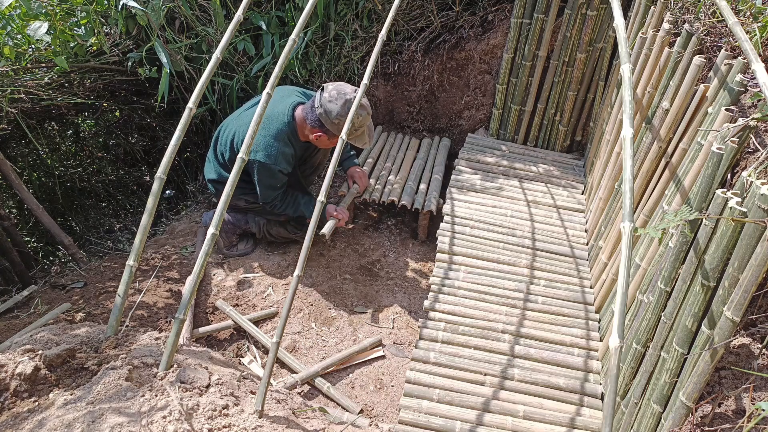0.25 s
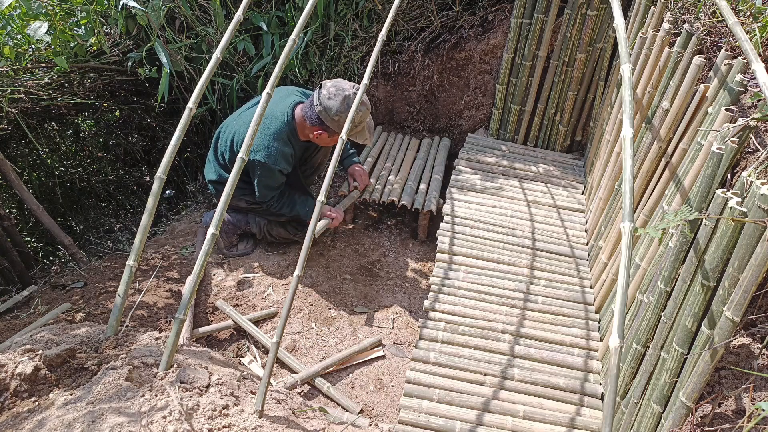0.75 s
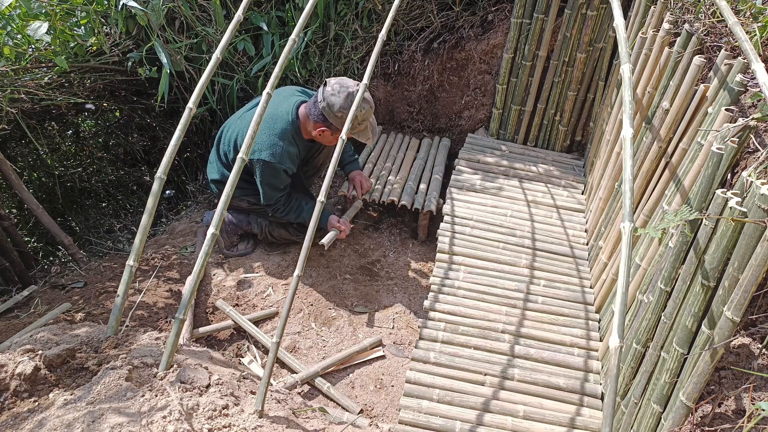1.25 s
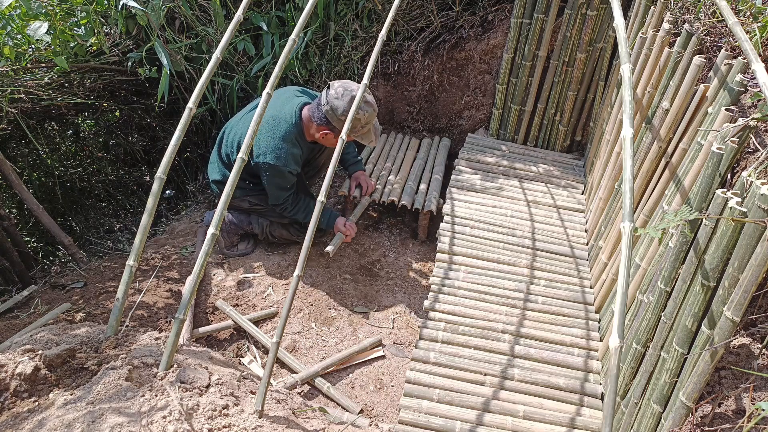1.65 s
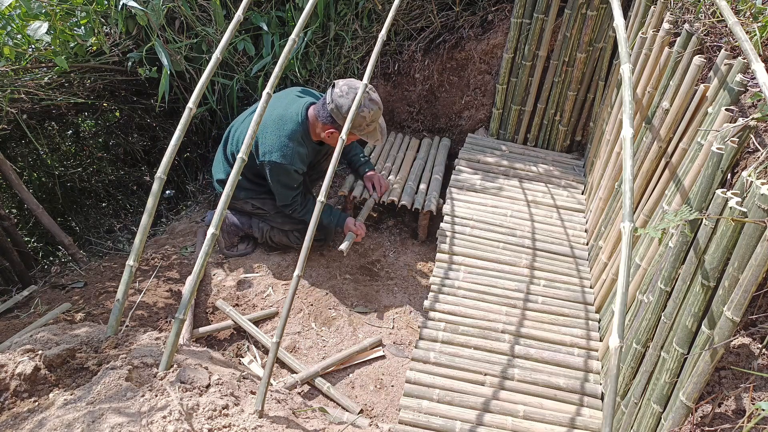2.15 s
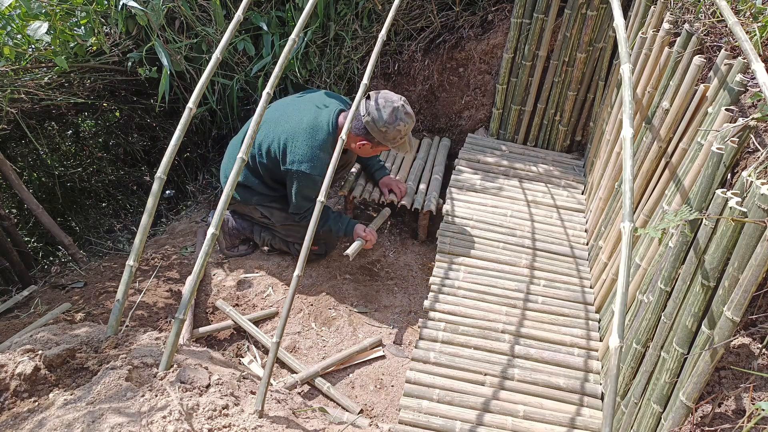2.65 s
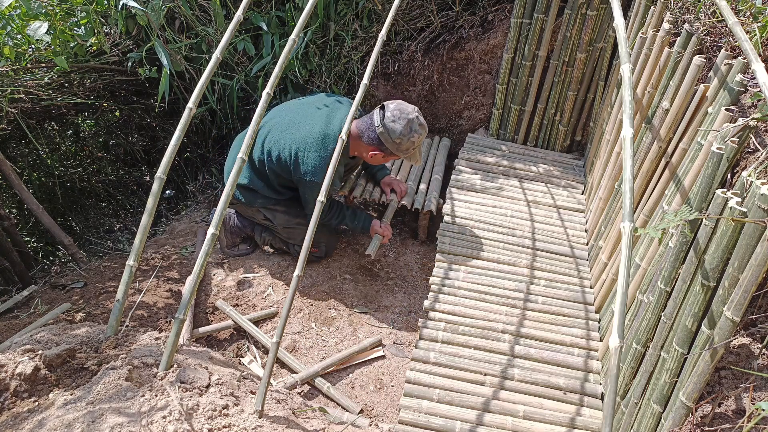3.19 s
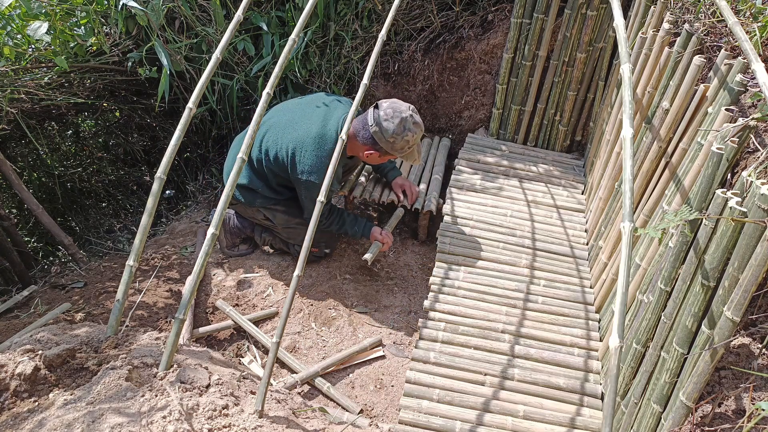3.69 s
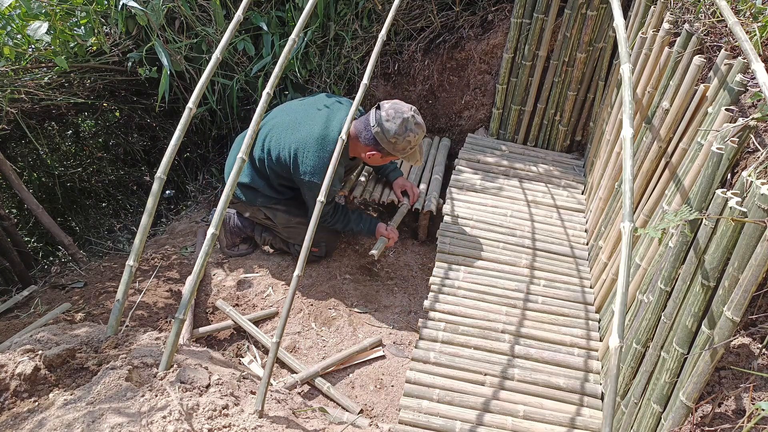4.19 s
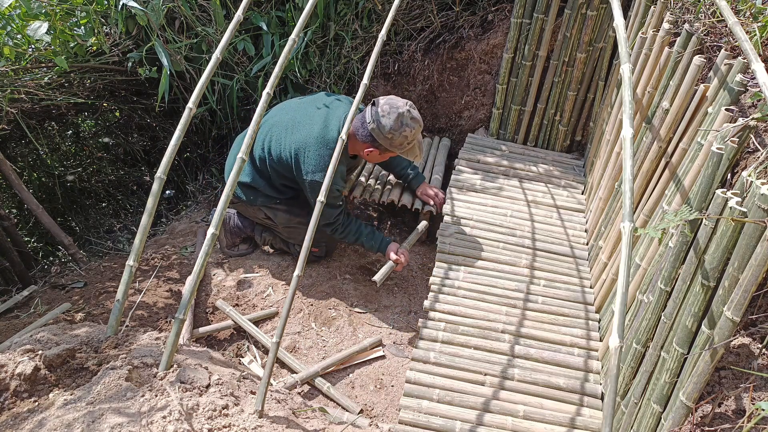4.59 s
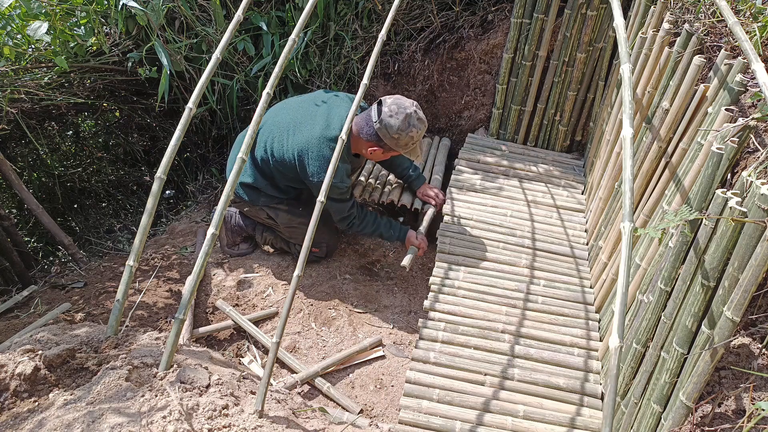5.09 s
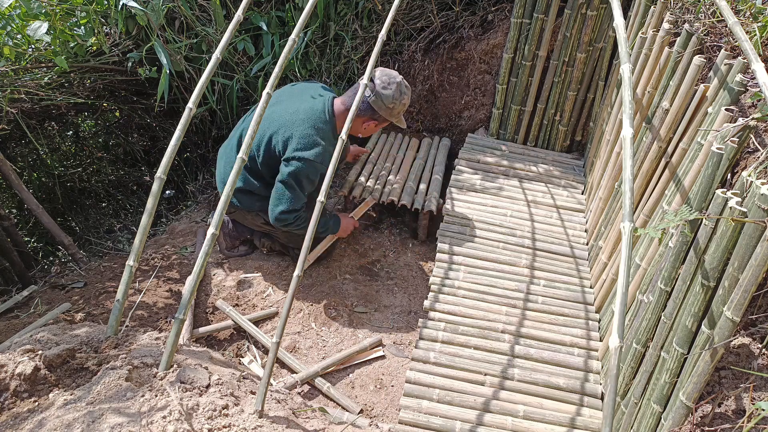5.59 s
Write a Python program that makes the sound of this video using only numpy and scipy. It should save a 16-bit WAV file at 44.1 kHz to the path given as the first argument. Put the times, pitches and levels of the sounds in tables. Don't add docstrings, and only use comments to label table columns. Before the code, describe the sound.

Faint ticks of a gripped stick come first, then three hard bamboo clacks, a pause, four softer ones, and further groups of three, two and two. The knocks are loud, dry and very short, with slight echoes from an open hut. Faint insects and far birds continue beneath; at the end the worker shifts, rustling and tapping quietly.

```python
import sys
import numpy as np
from scipy import signal
from scipy.fft import rfft, irfft, next_fast_len
from scipy.io import wavfile

SR = 44100
rng = np.random.default_rng(int(sys.argv[2]) if len(sys.argv) > 2 else 0)


def level_to_linear(level):
    exponent = np.asarray(level, float) / 20
    return 10 ** exponent


def generate_wav(signal):
    frames = np.transpose(np.atleast_2d(signal))
    scaled = np.clip(frames, -1, 1) * 32767
    pcm = np.round(scaled).astype(np.int16)
    wavfile.write(sys.argv[1], SR, pcm)


N = 257544

# (time [s], peak [dB], rattle [dB], rattle tilt [dB per octave], thump [dB])
KNOCKS = [(0.46, -10.5, -19, -3.5, -37.5), (0.73, -3, -24, 0.7, -44.5), (0.975, -1.5, -22.5, 2.7, -54),
          (1.7934, -11.5, -28, -0.3, -39.5), (2.0334, -9.5, -24.5, 1.6, -53), (2.3409, -10, -27, 0, -49.5),
          (2.565, -5, -24, 0.2, -50), (3.1166, -7.5, -19, 1.14, -41.5), (3.3538, -2, -19.5, 2, -44.5),
          (3.6005, -6, -19, 2.5, -44), (4.1662, -10.5, -21, 1.9, -45), (4.4208, -8, -20.5, 1.64, -46),
          (4.9774, -10, -24, -1.5, -29.5), (5.2325, -6.5, -19.5, 2.16, -40)]
# (delay [ms], level [dB], delay [ms], level [dB])
BOUNCES = [(1.3, -4.5, 4.2, -12), (2.9, -2.5, 4.6, -10), (1.4, 2.5, 3.3, -2), (2.6, -1.5, 3.7, -10.5),
           (1.4, -3.5, 3.1, 3), (2.1, 1, 5.6, -5), (1.9, 4.5, 3.4, -3.5), (1.7, 5, 2.6, -3),
           (1.7, 0.5, 2.6, -3), (1.6, 3, 2.2, -5.5), (1.233, -3.5, 3.9, -0.5), (0.703, -0.5, 3.6, -4.5),
           (1.4, 0, 3.6, -4), (1.6, -0.5, 3.9, -4.5)]
ECHOES = [-34, -32.5, -34.5, -33.5, -37, -35, -36.5, -38, -34, -38, -35.5, -36.5, -34.5, -35.5]
# (frequency [Hz], level [dB], t60 [s])
FIRST_SLATS = [
    [(343, -11, 0.059), (1386, 10.5, 0.012), (1970, -5, 0.021), (2328, 5, 0.027), (3420, -5, 0.054),
     (1290, -25, 0.033), (780, -12, 0.027)],
    [(353.6, -15, 0.07), (774, -5, 0.011), (1510, -3.5, 0.069), (1700, -2.5, 0.02), (2067, 1, 0.028),
     (2330, 4.5, 0.02), (2880, -4, 0.018), (3360, -6, 0.018), (4520, -7.5, 0.032), (5319, -12.5, .03),
     (5900, -15.5, 0.034)],
    [(355.8, -19.5, 0.028), (720, -10, 0.028), (1485, -3, 0.032), (1776, -10.5, 0.024), (1840, -2, 0.015),
     (2257, -4.5, 0.024), (2650, 4, 0.02), (3100, -3, 0.031), (3407, -1.5, 0.028), (4830, -13, 0.014),
     (5705, -11, 0.075)],
]
SECOND_SLATS = [
    [(375, -11.5, 0.035), (556, -11, 0.019), (780, -5, 0.052), (1130, -1, 0.083), (1383, 0.5, 0.01),
     (1476, 2.5, 0.027), (1848, -2, 0.027), (2790, 1.5, 0.0074), (3900, -6, 0.0091)],
    [(322, -11.5, 0.012), (783, -7.5, 0.029), (969, -6.5, 0.036), (1460, 1.5, 0.056), (1870, 8, 0.012),
     (2440, -5.5, 0.021), (2770, -2, 0.022), (3400, -4.5, 0.026), (4020, -1.5, 0.013), (4480, -7.5, 0.015)],
    [(341, -13.5, 0.048), (530, -10, 0.043), (771, -6, 0.063), (985, -5, 0.043), (1455, 5.5, 0.021),
     (1874, 2, 0.026), (2197, 4, 0.022), (2740, 7.5, 0.0049), (3920, 2, 0.0085), (4270, 2, 0.024),
     (5720, -8.5, 0.036)],
    [(638, -19.5, 0.05), (1484, 6.5, 0.007), (2110, 4, 0.024), (3200, -5, 0.044), (4120, -4, 0.013),
     (5800, -13, 0.017)],
]
THIRD_SLATS = [
    [(335, -9.5, 0.0068), (498, -10, 0.024), (1240, 5, 0.032), (1370, -12, 0.04), (1990, 2.5, 0.021),
     (2280, 5, 0.026), (3360, -3.5, 0.026), (5890, -2.5, 0.013)],
    [(339, -24, 0.03), (520, -14, 0.031), (1240, 3, 0.04), (1595, -8, 0.021), (2056, 5.5, 0.037),
     (2506, -0.5, 0.052), (2940, 2, 0.0093), (3430, -10, 0.024), (5940, -14.5, 0.014)],
    [(313, -27, .025), (560, -1.5, 0.02), (1270, 8, 0.038), (1410, -3.5, 0.081), (2014, 9, 0.0262),
     (2354, 4.5, 0.018), (3400, 2.5, 0.017), (5850, 3.5, 0.018)],
]
FOURTH_SLATS = [
    [(339, -19, 0.063), (495, -12, 0.013), (865, -5, 0.0183), (1162, -8, 0.045), (1490, -2, 0.036),
     (2200, 0, 0.018), (2450, 0, 0.014), (4000, -10, .018), (5860, -10.5, 0.015)],
    [(328, -17, 0.078), (743, -3.5, 0.021), (1254, 0, 0.031), (1630, 0.5, 0.021), (1906, 0.5, 0.01),
     (2400, -4.5, 0.017), (2800, 1, 0.011), (3820, -2.5, 0.0093), (5840, -2, 0.014)],
]
FIFTH_SLATS = [
    [(367, -18, 0.037), (720, -8, 0.033), (1350, 4, 0.04), (1610, -2.5, 0.023), (2372, -4, 0.011),
     (2700, -13, 0.023), (4064, -15.5, 0.019)],
    [(365, -18.5, 0.037), (817, -3.5, 0.021), (910, -5.5, 0.02), (1165, -7, 0.048), (1700, 6.5, 0.019),
     (1933, -1, 0.047), (2220, -9, 0.049), (2510, 3.5, 0.019), (3260, 0, 0.01), (4140, 5, 0.011)],
]
SLATS = FIRST_SLATS + SECOND_SLATS + THIRD_SLATS + FOURTH_SLATS + FIFTH_SLATS
# (frequency [Hz], density [dB per Hz])
RATTLE = [(180, -49.5), (300, -9.5), (762, -12.5), (1430, 3), (1780, -7), (2440, -1.5), (4830, -14),
          (6000, -13.5), (7440, -34.5), (16000, -40)]
# (frequency [Hz], t60 [s])
RATTLE_T60 = [(150, 0.11), (900, 0.025), (2400, 0.02), (6400, 0.025), (14000, 0.027)]
# (frequency [Hz], level over the rattle [dB])
CRACK = [(4500, -18), (8500, 3), (15000, 6)]
# (frequency [Hz], width [Hz], level [dB])
WALLS = [(1400, 1500, -12), (3200, 1700, 2), (6000, 1400, -3)]
# (frequency [Hz], left minus right [dB])
PORT_BALANCE = [(300, -.3), (1400, 2), (3100, -4), (4100, 2), (5200, -10.5), (7500, -11), (8300, 19),
                (9600, 16), (11500, 10), (13500, -2)]
# (time [s],
# peak [dB], ring [Hz])
TICKS = [(0.1186, -49, 1970), (.131, -51, 1570), (.1394, -48, 1990), (.149, -50, 1500), (0.2096, -40, 2320),
         (0.3252, -43, 2160), (.52, -53, 1330), (.54, -53, 1350), (1.2745, -49, 3000),
         (2.0469, -24.5, 1500), (2.06, -35, 3400), (2.142, -52, 2340), (2.2393, -49, 2000),
         (2.8699, -45.5, 2280), (3.3665, -27, 2650), (3.369, -27, 2550), (3.3723, -24.5, 2700),
         (3.376, -23.5, 2600), (3.379, -26, 2700), (3.383, -29.5, 2607), (3.414, -43, 2800),
         (3.428, -45, 2700), (3.5713, -51.5, 2030), (3.7668, -50.5, 2300), (3.8744, -53, 2110),
         (3.942, -51.5, 2266), (3.958, -53, 1980), (3.9754, -50.5, 2200), (3.995, -55, 2400),
         (4.008, -55, 2140), (4.095, -56, 2400), (4.114, -56, 2350), (4.255, -58, 2200), (4.316, -55, 2200),
         (4.36, -57, 2350), (4.6169, -46.5, 2226), (4.8314, -52, 2180), (4.8514, -43, 1800),
         (5.49, -51, 2350), (5.533, -51, 2000), (5.5494, -51, 2400), (5.67, -61, 2400), (5.688, -54, 2550)]
# (time [s], peak [dB], ring [Hz])
BUMPS = [(.027, -56, 810), (.09, -59, 45), (.16, -56, 493), (.19, -59, 500), (.255, -60, 506),
         (.28, -58, 477), (.305, -56, 497), (1.309, -58.5, 37), (1.369, -58, 960), (1.471, -52, 255),
         (2.7, -56.5, 526), (2.758, -53.5, 227), (2.87, -55, 530), (3.91, -56, 90), (4.285, -58.5, 40),
         (5.281, -44.5, 385), (5.312, -51, 432), (5.385, -56, 434), (5.43, -56, 716), (5.46, -52, 770),
         (5.566, -51, 427), (5.72, -57, 427), (5.768, -54, 625), (5.787, -51, 1045)]
# (time [s], peak [dB], ring [Hz])
LOOSE_TAPS = [
    (5.7673, -45, 2014),
    (5.7676, -55, 1470),
    (5.7857, -37, 2020),
]
# (start [s], hold [s], rustle rise [dB], knees rise [dB])
SHIFTS = [
    (5.33, 0.195, 14, 23),
    (5.7, 0.042, 13, 21.5),
]
# (frequency [Hz], width [Hz], level [dB])
HOLLOWS = [(221, 13, -0.35), (440, 120, -8.5), (720, 210, -13.5)]
# (frequency [Hz], width [Hz], level [dB])
CICADAS = [(6460, 800, -1.1), (6260, 1000, -5.5)]
# (time [s], level [dB])
SONG_STARTS = [
    (.385, -4),
    (0.779, 0.5),
    (1.178, 1),
    (1.575, 1),
]
# (offset [s], length [s], from [Hz], to [Hz], level [dB])
WARBLE = [
    (-.004, .058, 5800, 3950, -62),
    (.044, .016, 4000, 3960, -66),
    (0.076, 0.029, 6870, 6067, -63.5),
    (.1, .04, 6200, 6950, -64),
    (0.239, .035, 5558, 6154, -63),
    (0.269, .03, 7064, 6110, -64.5),
    (.29, 0.025, 4706, 5237, -65),
    (0.304, .04, 4928, 6730, -62),
    (0.346, 0.028, 5890, 6673, -68),
]
# (time [s], length [s], from [Hz], to [Hz], level [dB])
WHISTLES = [(1.456, 0.048, 3310, 3246, -62), (1.719, 0.084, 3100, 3170, -68),
            (4.228, 0.032, 3330, 3200, -61), (4.702, 0.072, 3240, 3100, -64.5),
            (4.781, 0.047, 2830, 2440, -64), (5.094, .045, 3360, 3140, -64), (5.138, .045, 2940, 2600, -64),
            (5.429, 0.068, 3060, 2340, -62.5), (5.47, 0.062, 3290, 3250, -63),
            (5.519, 0.053, 3260, 3250, -56.5), (5.603, 0.05, 3250, 3240, -62.5),
            (5.662, .03, 3240, 3230, -63), (5.75, 0.044, 3265, 3150, -64)]
# (frequency [Hz], density [dB per Hz])
AIR = [(15, -37.5), (25, -8), (114, -4), (223, -3), (301, -5.5), (373, -1.5), (1040, -7), (3430, -10),
       (4740, -13), (6560, -20.5), (7710, -26), (14800, -23.5), (16000, -33)]
# (frequency [Hz], correlation [-1 to 1])
LIKENESS = [(60, -0.092), (130, 0.33), (290, 0.86), (640, -0.56), (1410, -0.26), (3100, 0.78),
            (6820, -0.31), (15000, 0.4)]

CRACK_T60_S = 0.004
LEGS_DB = -34.5
PAN_DB, PAN_PER_DB = 2.6, 0.39
LAG_MS, LAG_MS_PER_S = 0.047, -0.0032
PORT_LAG_TOP_HZ = 6600
SLIDE_DB, SLIDE_S = 4.5, 0.023
SHIFT_ATTACK_S, SHIFT_RELEASE_S = 0.045, 0.12
HANDS_DB, STILL_RUSTLE_DB, STILL_KNEES_DB = -74.5, -79, -84
RUMBLE_DB, CICADA_DB, AIR_DB = -69, -68.5, -61.5
CRICKET_DB, CRICKET_DB_PER_S = -67.5, -1.2
SONG_FROM_S = 0.6
CUTOFF_HZ = 17000


def rms_one(x):
    return x / np.sqrt(np.mean(x ** 2) + 1e-20)


def at_hz(points, hz):
    table_hz, values = np.array(points).T
    return np.interp(np.log(hz), np.log(table_hz + 1e-9), values)


def add(out, part, s):
    i = round(s * SR)
    out[:, i:i + part.shape[-1]] += part[..., :N - i]


def drift(rate):
    r = np.exp(-80 * np.pi * rate / SR)
    white = rng.standard_normal(N // 40 + 2002)
    slow = signal.lfilter([1], [1, -2 * r, r * r], white)[2000:]
    return np.interp(np.arange(N) / 40, np.arange(len(slow)), rms_one(slow))


def resonate(x, peaks):
    out = 0
    for hz, width_hz, db in peaks:
        r = np.exp(-np.pi * width_hz / SR)
        poles = [1, -2 * r * np.cos(2 * np.pi * hz / SR), r * r]
        out = out + level_to_linear(db) * signal.lfilter([1, 0, -1], poles, x) * (1 - r * r) / 2
    return out


def bands(white, low_hz):
    edges = low_hz * 2 ** np.arange(0, np.log2(19000 / low_hz), 1 / 3)
    for k, (low, high) in enumerate(zip(edges, edges[1:])):
        band = signal.butter(2, [low, high], "band", fs=SR, output="sos")
        mid, side = signal.sosfilt(band, white[k % 2])
        yield np.sqrt(low * high), mid, side


def ports(mono, pan_db, lag_ms):
    length = mono.shape[-1]
    size = next_fast_len(length + 256)
    hz = np.arange(size // 2 + 1) * SR / size + 1
    phase = np.pi * np.minimum(hz, PORT_LAG_TOP_HZ) * lag_ms / 1000
    half = level_to_linear((at_hz(PORT_BALANCE, hz) + pan_db) / 2) * np.exp(1j * phase)
    padded = np.pad(np.atleast_2d(mono), [(0, 0), (64, 0)])
    return irfft(rfft(padded, size) * [half, 1 / half], size)[:, 64:64 + length]


def knocks():
    out, t = np.zeros((2, N)), np.arange(round(0.2 * SR)) / SR
    lead = round(0.005 * SR)
    before = (np.arange(lead + 1) - lead) / SR
    blows = zip(KNOCKS, BOUNCES, ECHOES, SLATS, rattles(t))
    for (s, db, rattle_db, _, thump_db), bounce, echo_db, modes, (shared, apart) in blows:
        pan_db, lag_ms = PAN_DB + PAN_PER_DB * db, LAG_MS + LAG_MS_PER_S * s
        first_ms, first_db, second_ms, second_db = bounce
        contact = level_to_linear(-34) * rng.standard_normal(lead + 1) * np.exp(before / 0.002)
        contact[lead] = 1

        ring = rung(modes, t)
        ring = ring - level_to_linear(first_db) * rung(modes, t - first_ms / 1000)
        ring = ring + level_to_linear(second_db) * rung(modes, t - second_ms / 1000)
        ring = signal.fftconvolve(ring, contact)[:len(t)]
        ring = signal.sosfilt(signal.butter(2, 170, "high", fs=SR, output="sos"), ring)
        ring = level_to_linear(db) * ring / np.abs(ring).max()

        first_again = level_to_linear(first_db) * np.roll(shared, round(first_ms * SR / 1000))
        second_again = level_to_linear(second_db) * np.roll(shared, round(second_ms * SR / 1000))
        chatter = shared + first_again + second_again
        rattle = level_to_linear(db + rattle_db + 21.5) * np.roll(chatter, lead)
        add(out, ports(ring + rattle, pan_db, lag_ms), s - lead / SR)
        add(out, level_to_linear(db + rattle_db + 23.0) * ports(apart, pan_db, lag_ms) * [[1], [-1]], s)

        answered = rattle + level_to_linear(-16) * ring
        echo = signal.fftconvolve(walls(t), answered[None], axes=1)
        add(out, level_to_linear(echo_db) * ports(echo, 0, 0), s - lead / SR)

        legs = rung([(125.2, LEGS_DB, 0.086)], t)
        late = t - 0.023
        push = np.exp(-(late / 0.0105) ** 2) * np.cos(2 * np.pi * 68 * late)
        thump = level_to_linear(thump_db) * (push + resonate(push, [(59.7, 13, -13.0)]))
        add(out, level_to_linear(db) * (legs + thump), s)
    return out


def rung(modes, t):
    t = np.maximum(t, 0)
    free = 0
    for k, (hz, db, t60) in enumerate(modes):
        decay = level_to_linear(db - 60 * t / np.clip(t60, 0.004, 0.044))
        free = free + decay * np.sin(2 * np.pi * hz * t) * (-1) ** k
    return free * (1 - np.exp(-t / 0.0003))


def rattles(t):
    tilt_db, out = np.array(KNOCKS)[:, -2:-1], 0
    for hz, mid, side in bands(rng.standard_normal((2, 2, len(KNOCKS), len(t))), 199.1):
        decay_db = -60 * t / at_hz(RATTLE_T60, hz)
        level = level_to_linear(at_hz(RATTLE, hz) + tilt_db * np.log2(hz / 2000) + decay_db)
        level = level * (1 + level_to_linear(at_hz(CRACK, hz) - 60 * t / CRACK_T60_S))
        out = out + level * np.array([mid, 0.39 * side])
    return out.transpose(1, 0, 2) * (1 - np.exp(-t / 0.00038))


def walls(t):
    scatter = rng.standard_normal((2, len(t))) * level_to_linear(4.7 * rng.standard_normal((2, len(t))))
    hut, slope = level_to_linear(-60 * t / 0.066), level_to_linear(-11.5 - 60 * t / 0.22)
    return resonate(scatter * (hut + slope) * (t > 0.006), WALLS)


def touches(rows, spread, t60, scuff_db):
    out, t = np.zeros((2, N)), np.arange(round(0.08 * SR)) / SR
    for (s, db, hz), near in zip(rows, rng.standard_normal((len(rows), 443))):
        below_hz = hz * (1 - spread + 0.06 * near[0])
        above_hz = hz * (1 + spread + 0.047 * near[1])
        ring = rung([(hz, 0, t60), (below_hz, -4, t60 * 0.48), (above_hz, -4, t60 * 0.28)], t)
        scuff = near[3:] * np.exp(-t[:440] / 0.0018)
        ring[:440] += level_to_linear(scuff_db) * resonate(scuff, [(3500, 2900, 0.004)])
        add(out, ports(level_to_linear(db) * ring / np.abs(ring).max(), 0.82 * near[2], 0.037), s)
    return out


def hands(level_db):
    grains = (rng.standard_normal(N) + 0.6 * rng.standard_normal((2, N))) * level_to_linear(3.0 * drift(45))
    return level_to_linear(level_db) * rms_one(resonate(grains, [(1500, 410, -6), (2025, 190, 2.5)]))


def sliding(t):
    return SLIDE_DB * np.max([np.exp(-((t - s) / SLIDE_S) ** 2) for s, *_ in TICKS], axis=0)


def rustle(level_db):
    grains = rng.standard_normal((2, N)) * level_to_linear(3.6 * drift(90))
    bright = signal.butter(1, [2500, 13000], "band", fs=SR, output="sos")
    return level_to_linear(level_db) * rms_one(signal.sosfilt(bright, grains))


def knees(level_db):
    drag = (rng.standard_normal(N) + 0.5 * rng.standard_normal((2, N))) * level_to_linear(2.8 * drift(30))
    return level_to_linear(level_db) * rms_one(resonate(drag, [(470, 380, 0)]))


def shifting(t):
    rise_db = 0
    for s, hold, rustle_db, knees_db in SHIFTS:
        corners = np.cumsum([0, SHIFT_ATTACK_S, hold, SHIFT_RELEASE_S])
        rise_db = rise_db + np.interp(t - s, corners, [0, 1, 1, 0]) * np.array([[rustle_db], [knees_db]])
    return rise_db


def cricket(level_db):
    t = np.arange(N) / SR
    chirp = np.clip(1.6 * np.cos(2 * np.pi * (t - 0.082) / 0.1215) + 0.1, 0, 1)
    chirp = chirp + 0.3 * np.clip(t / 2.5, 0.3, 1)
    strokes = np.clip(np.sin(2 * np.pi * 172 * t) + 0.3, 0, 1)
    wing = rng.standard_normal(N) + 0.3 * rng.standard_normal((2, N))
    song = resonate(resonate(wing * chirp * strokes, [(3400, 390, 0)]), [(3373, 120, 0)])
    return level_to_linear(level_db - 3.0) * rms_one(song)


def cicadas(level_db):
    buzz = 1 + 0.25 * np.sin(2 * np.pi * np.cumsum(71 + 3 * drift(1.2)) / SR)
    chorus = resonate(resonate(rng.standard_normal((2, N)) * buzz, CICADAS), [(6186, 1000, 0)])
    return level_to_linear(level_db + 0.95 * drift(7)) * rms_one(chorus) * level_to_linear(np.array([[-1.5], [1.5]]))


def birds(wet_db):
    out, t = np.zeros((2, N)), np.arange(round(0.25 * SR)) / SR
    trees = rng.standard_normal((2, len(t))) * level_to_linear(wet_db - 60 * t / 0.35)
    trees[:, 0] = level_to_linear(np.array([-5.5, -1.5]))
    open_air = trees * np.where(t > 0, level_to_linear(-11), level_to_linear(0.5))

    sung = []
    for s, verse_db in SONG_STARTS:
        for offset, long, from_hz, to_hz, db in WARBLE:
            if s + offset > SONG_FROM_S:
                sung.append((s + offset, long, from_hz, to_hz, db + verse_db))

    for notes, path in [(sung, trees), (WHISTLES, open_air)]:
        for s, long, from_hz, to_hz, db in notes:
            size = round(long * SR)
            glide = np.sin(2 * np.pi * np.cumsum(np.linspace(from_hz, to_hz, size)) / SR)
            note = glide * np.hanning(size) ** 0.21
            add(out, level_to_linear(db) * signal.fftconvolve(path, note[None], axes=1), s)
    return out


def rumble(level_db, lumpy_db):
    shared, own = rng.standard_normal(N), rng.standard_normal((2, N))
    lumps = sum(level_to_linear(lumpy_db * drift(19)) * resonate(shared + 0.53 * own, [peak]) for peak in HOLLOWS)
    return level_to_linear(level_db) * rms_one(lumps)


def air(patchy_db):
    out = 0
    for hz, mid, side in bands(rng.standard_normal((2, 2, N)), 22.1):
        alike = np.clip(at_hz(LIKENESS, hz), -1, 1)
        stereo = np.sqrt(1 + alike) * mid + np.sqrt(1 - alike) * side * [[1], [-1]]
        out = out + level_to_linear(at_hz(AIR, hz) + patchy_db * drift(9)) * stereo
    return level_to_linear(AIR_DB) * rms_one(out)


def scene():
    t = np.arange(N) / SR
    rustle_db, knees_db = shifting(t)
    taps = touches(TICKS, spread=0.13, t60=0.014, scuff_db=-10.5)
    taps = taps + touches(BUMPS, spread=0.17, t60=0.054, scuff_db=-40)
    taps = taps + touches(LOOSE_TAPS, spread=0.24, t60=0.046, scuff_db=1)
    near = knocks() + taps + hands(HANDS_DB + sliding(t))
    near = near + rustle(STILL_RUSTLE_DB + rustle_db) + knees(STILL_KNEES_DB + knees_db)
    far = cricket(CRICKET_DB + CRICKET_DB_PER_S * t) + cicadas(CICADA_DB) + birds(wet_db=-25.5)
    return near + far + rumble(RUMBLE_DB, lumpy_db=4.0) + air(patchy_db=0.0)


def low_pass(x):
    return signal.sosfilt(signal.butter(12, 16650, fs=SR, output="sos"), x)


def record(dry):
    rounded = dry / (1 + (np.abs(dry) / 0.95) ** 4) ** (1 / 4)
    mix = signal.sosfilt(signal.cheby2(12, 60, CUTOFF_HZ, fs=SR, output="sos"), rounded)
    return low_pass(mix)


dry = scene()
out = record(dry)
generate_wav(out)
```